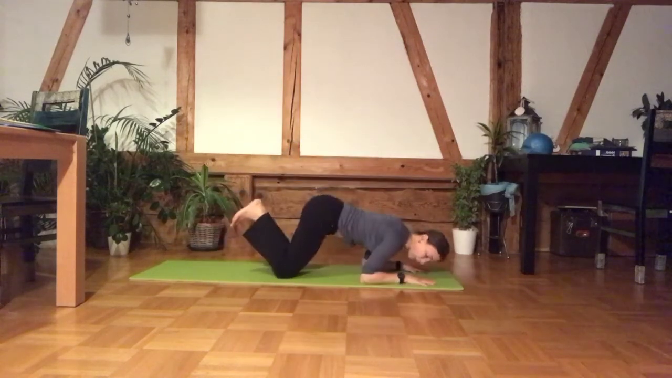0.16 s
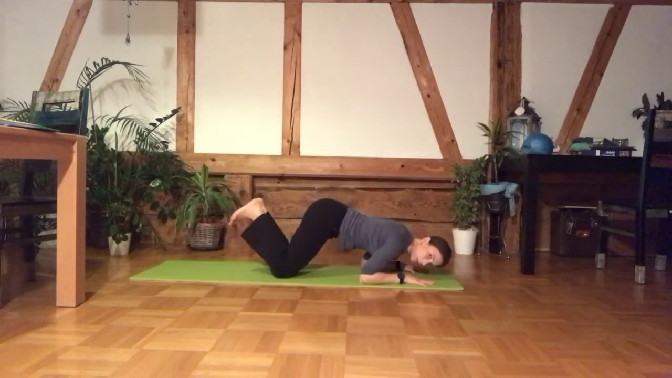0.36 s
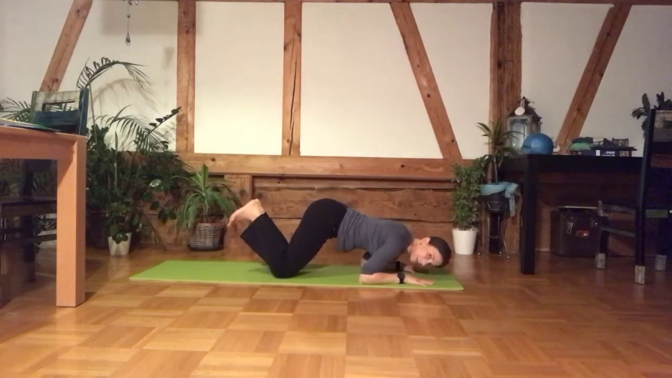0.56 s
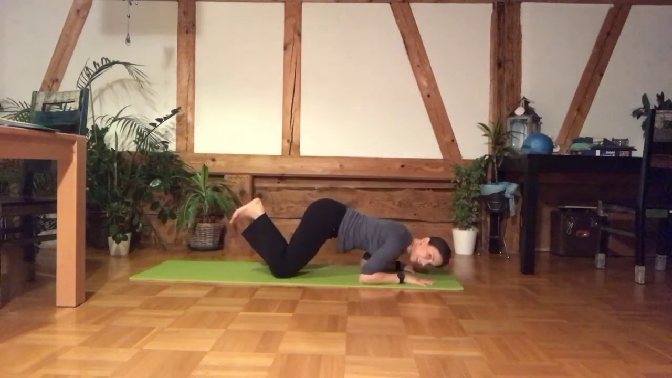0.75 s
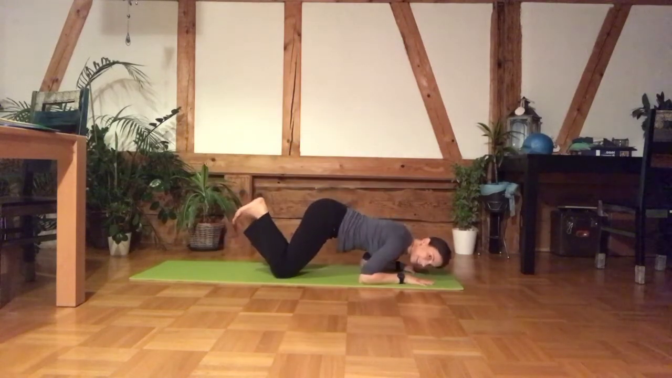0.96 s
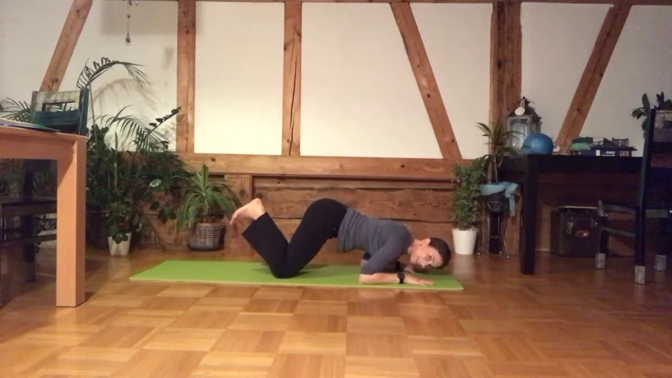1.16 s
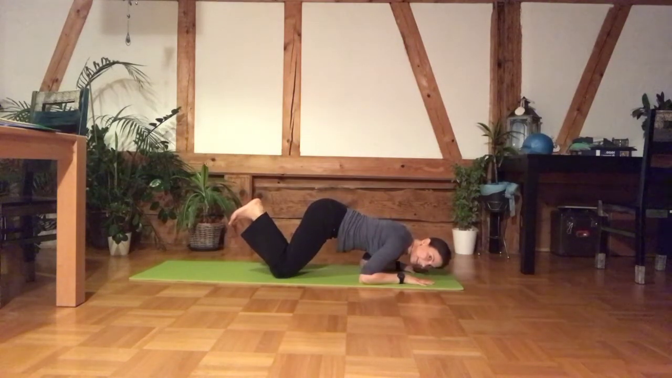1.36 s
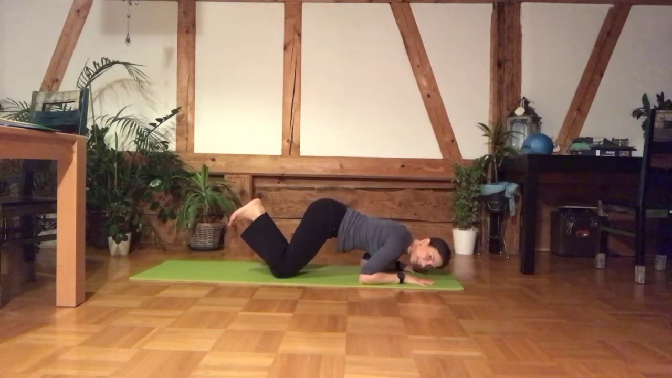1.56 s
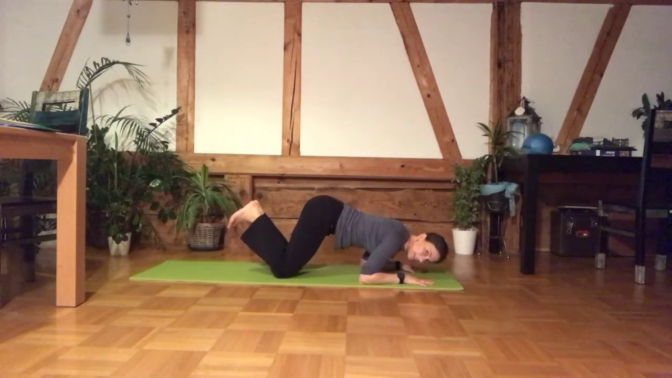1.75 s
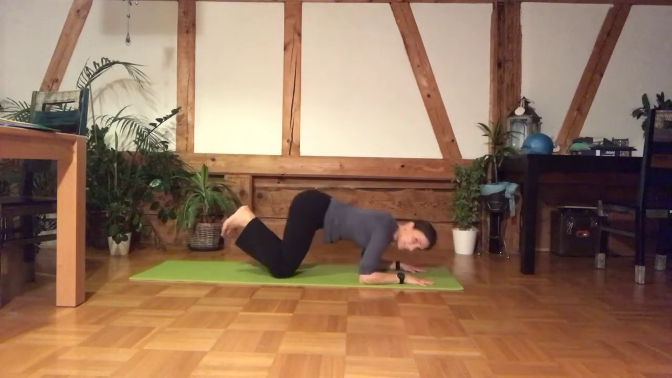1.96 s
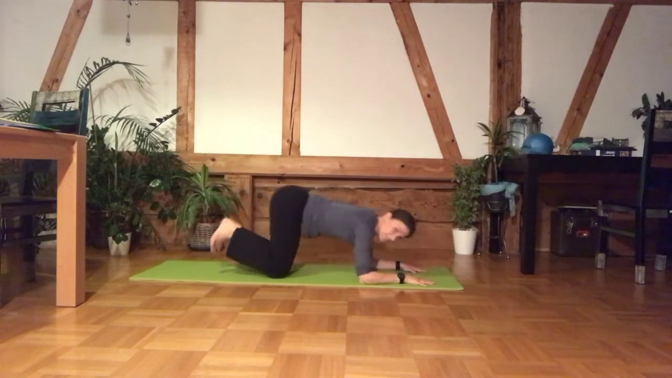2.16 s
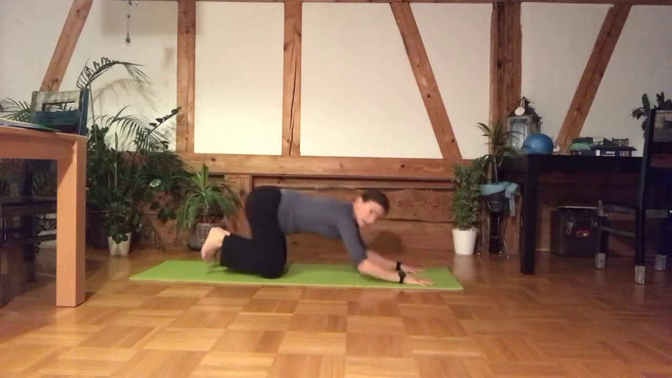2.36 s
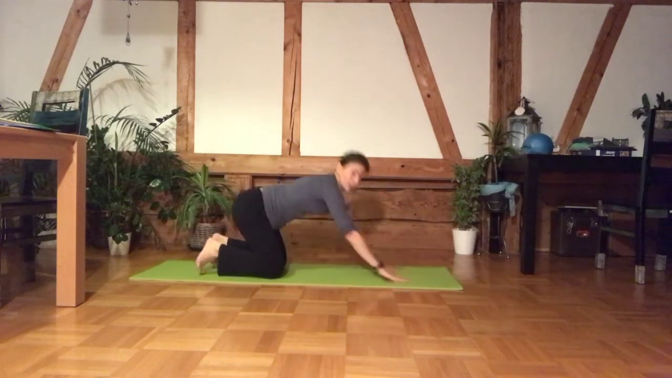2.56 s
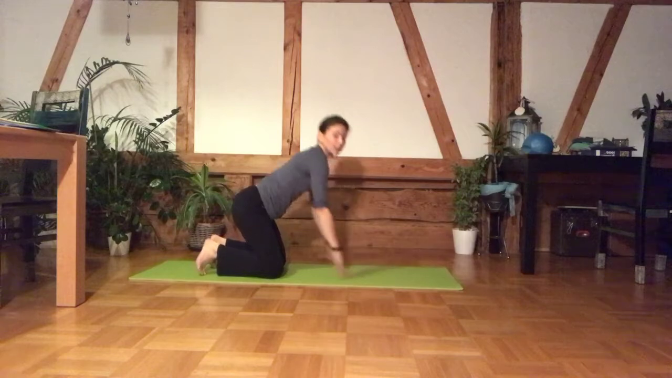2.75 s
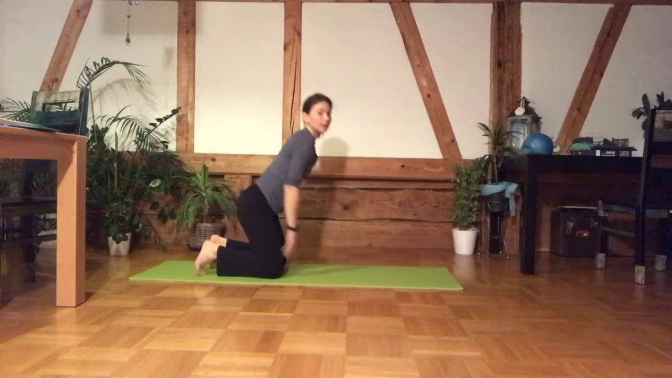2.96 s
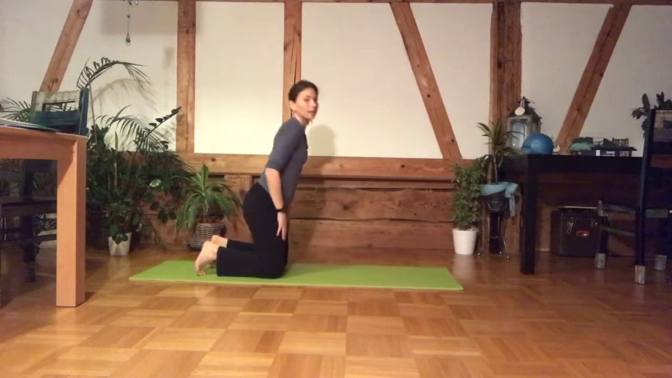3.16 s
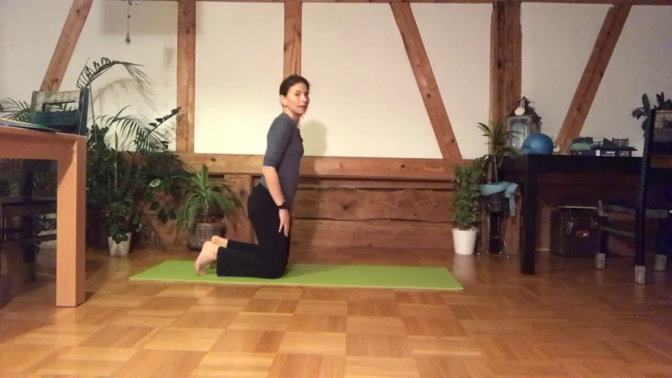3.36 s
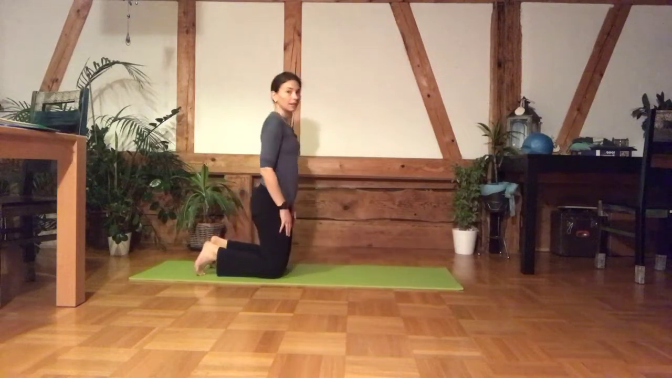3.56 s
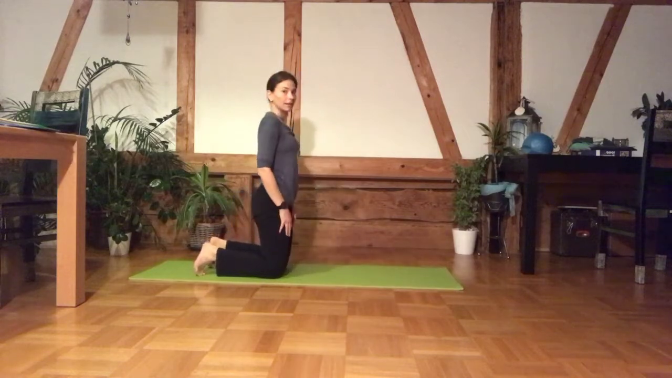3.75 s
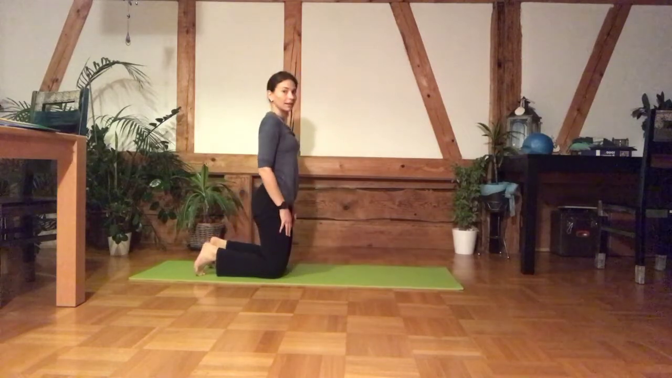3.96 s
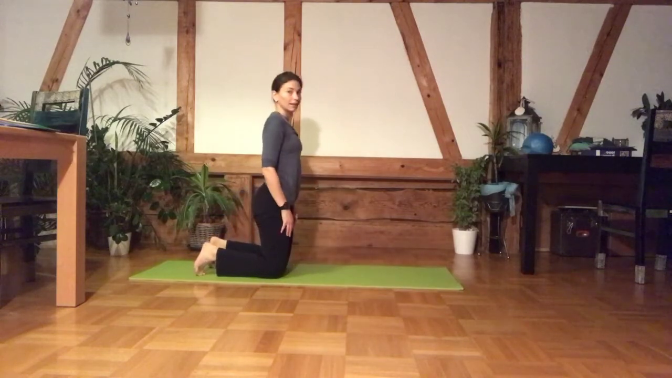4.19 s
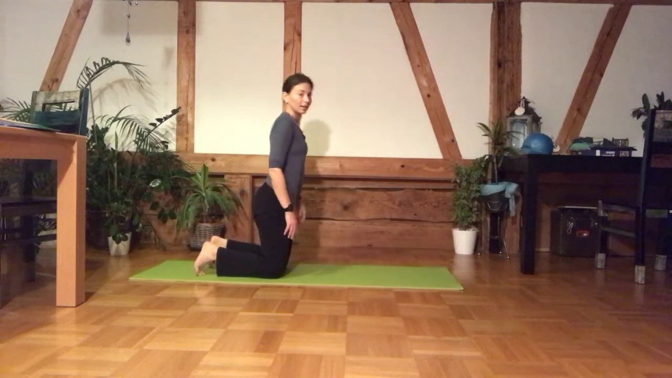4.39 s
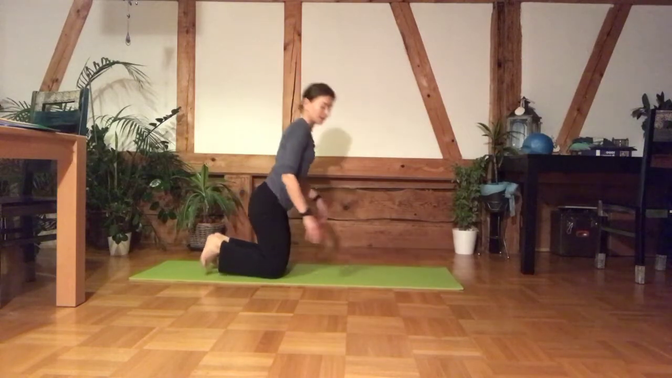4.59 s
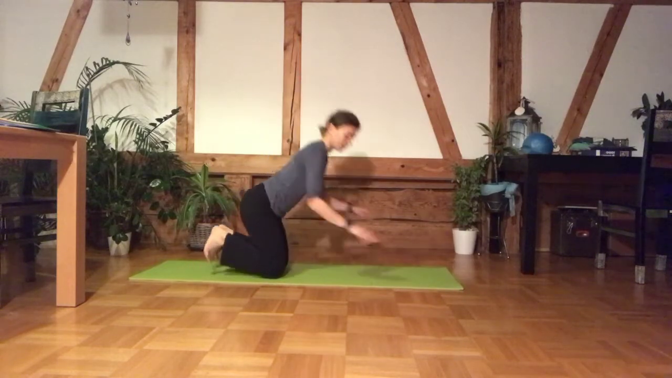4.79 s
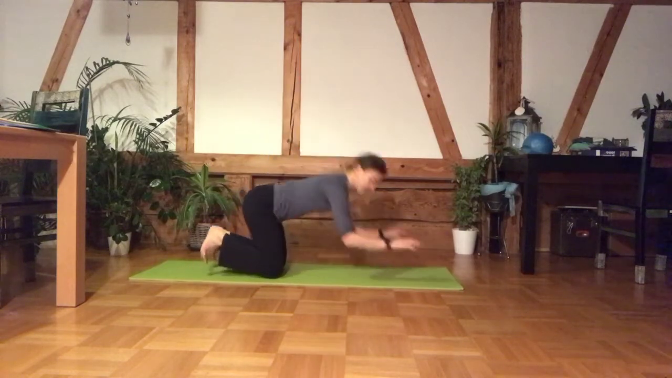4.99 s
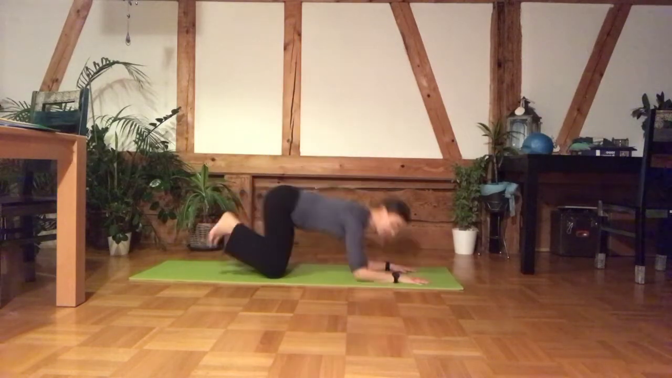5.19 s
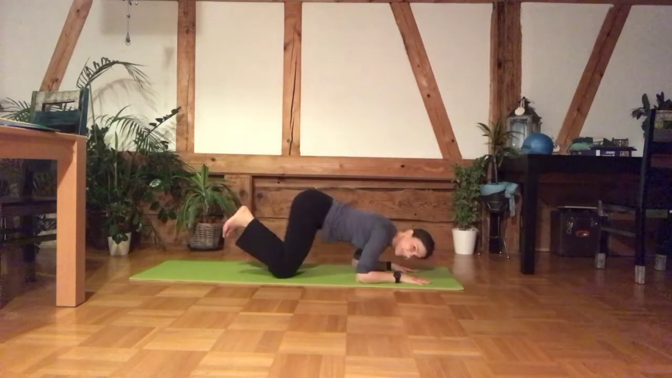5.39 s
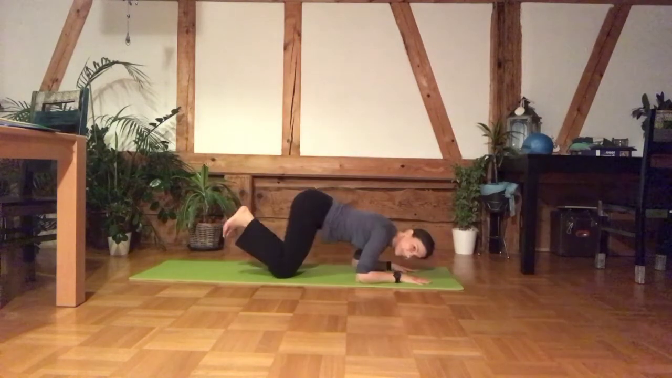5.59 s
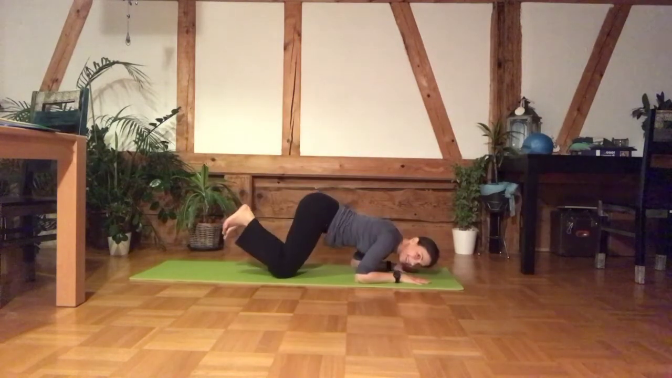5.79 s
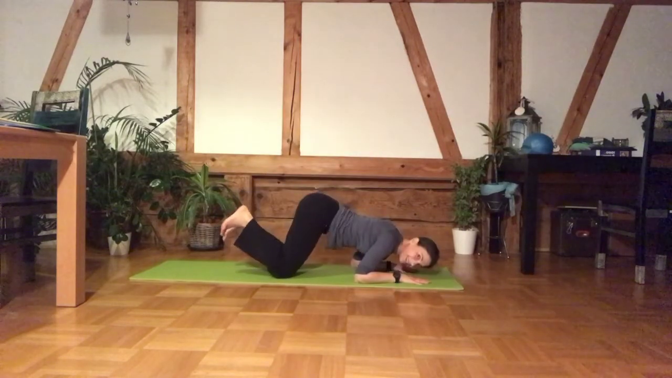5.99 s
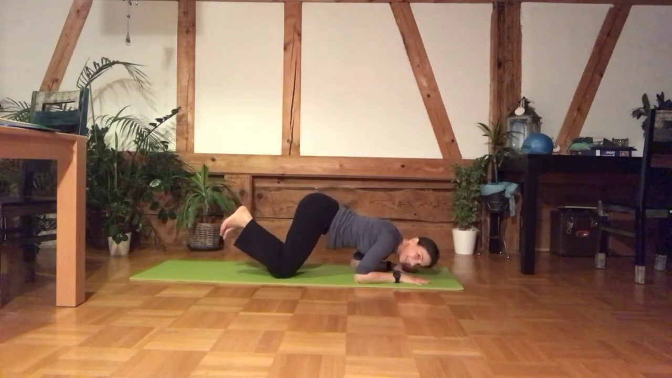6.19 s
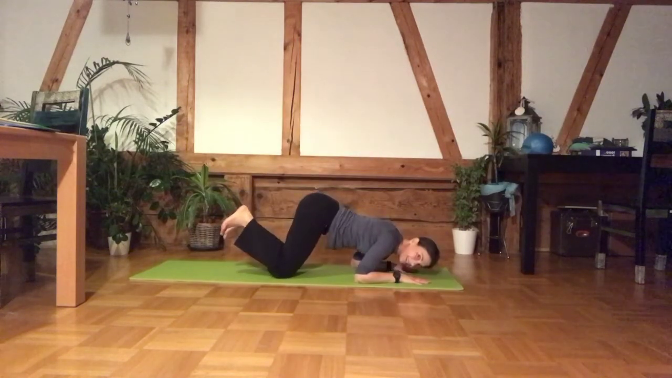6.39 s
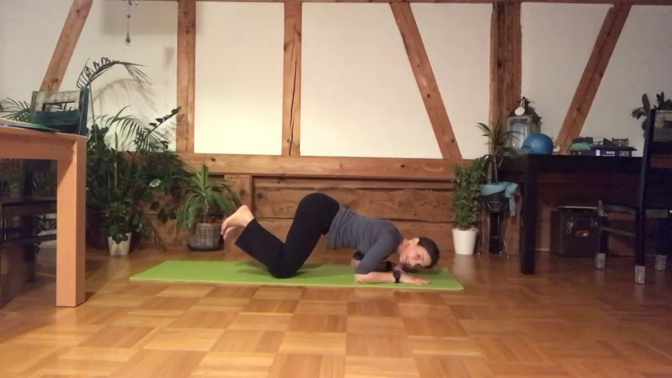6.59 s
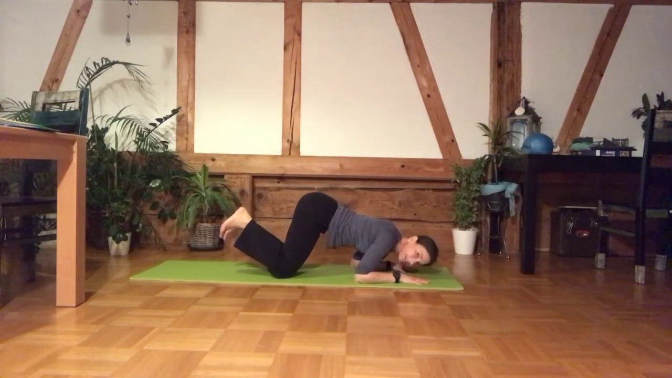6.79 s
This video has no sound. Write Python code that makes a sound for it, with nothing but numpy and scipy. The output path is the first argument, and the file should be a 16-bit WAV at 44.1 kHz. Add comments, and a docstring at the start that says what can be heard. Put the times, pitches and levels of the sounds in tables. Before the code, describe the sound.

Someone practises forward falls from the knees at home on a thin mat over parquet. The sound starts already in the crack and boom of a landing, followed by dull body rubbing. After a pause, skin brushes the foam in one airy half-second stroke. Faint clothing rustle, then another crisp, slightly softer slap with a lumpy low floor thump, dying away in a moderately live room, heard from a few metres.

```python
"""Forward breakfalls in a living room

From the knees onto a thin exercise mat on parquet, a few metres from the microphone; the first fall is just landing.
Forearms and palms slap the mat in noise cracks and room ring; the body's weight pulses the joist floor's modes.
Between the two falls a hand slides back over the mat, a hiss of filtered noise that follows its speed.
Clothes rustle faintly and the body rubs mat and boards, in noise swells over rumble, hiss and mains hum."""
import sys
import numpy as np
from scipy import signal
from scipy.fft import rfft, irfft
from scipy.io import wavfile

SR = 44100
rng = np.random.default_rng(int(sys.argv[2]) if len(sys.argv) > 2 else 0)


def unload_wav(signal):
    """Save mono or channel-first audio to the path in sys.argv[1] as 16-bit WAV at rate SR, clipped to [-1, 1]."""
    wavfile.write(
        sys.argv[1],
        SR,
        np.round(np.clip(np.atleast_2d(signal).T, -1, 1) * 32767).astype(np.int16),
    )


N = 301503
LEAD = SR // 4  # samples run before time 0, then dropped
TIME = np.arange(-LEAD, N) / SR  # seconds


def undb(db):
    """Decibels to gain."""
    return 10 ** (np.asarray(db) / 20)


def unit(x):
    """Scale to rms 1."""
    return x / np.sqrt(np.mean(x ** 2))


def noise():
    """White noise over the whole scene."""
    return rng.standard_normal(len(TIME))


def on_log_axis(hz, points):
    """Read (Hz, value) points on a log-frequency axis."""
    f, value = np.transpose(points)
    return np.interp(np.log(np.maximum(hz, 1)), np.log(f), value)


def colour(x, points, size=8192):
    """Causal minimum-phase filter with the given (Hz, dB) response, built by folding its cepstrum."""
    log_gain = np.log(undb(on_log_axis(np.fft.rfftfreq(size, 1 / SR), points)))
    cepstrum = irfft(log_gain)
    cepstrum[1:size // 2] *= 2
    cepstrum[size // 2 + 1:] = 0
    impulse = irfft(np.exp(rfft(cepstrum)))
    return signal.fftconvolve(x, impulse)[:len(x)]


def lowpass(x, hz, order=1):
    """Gentle low-pass."""
    sos = signal.butter(order, min(hz, SR / 2 - 1), fs=SR, output="sos")
    return signal.sosfilt(sos, x)


def friction(grain_db, grain_hz):
    """Dense tiny slips: noise whose strength wanders unevenly."""
    unevenness_db = grain_db * unit(lowpass(noise(), grain_hz))
    return unit(noise() * undb(unevenness_db))


def rubbing(rows, spectrum):
    """Brief bell-shaped swells of soft friction."""
    swell = sum(undb(db) * np.exp(-2 * ((TIME - s) / length) ** 2) for s, length, db in rows)
    return swell * unit(colour(friction(grain_db=1.5, grain_hz=150), spectrum))


# Reverberation of the living room: pitch_hz, t60_s (time to fall 60 dB)
ROOM_DECAY = [(100, 0.89), (180, 0.78), (310, 0.63), (600, 0.75), (1200, 0.56), (2200, 0.67), (4000, 0.57),
              (7000, 0.53), (15000, 0.27)]


def room_response(early_db, early_s):
    """Dense echoes, boosted at first by floor and near walls, decaying at each band's own rate; new for every spot."""
    t = np.arange(SR) / SR
    hz = np.fft.rfftfreq(SR, 1 / SR)
    spectrum = rfft(rng.standard_normal(SR))
    centres, t60s = np.transpose(ROOM_DECAY)
    response = np.zeros(SR)
    for share, t60 in zip(np.eye(len(centres)), t60s):
        band = irfft(spectrum * on_log_axis(hz, np.c_[centres, share]))
        response += band * np.exp(-np.log(1000) * t / t60)
    response *= 1 + undb(early_db) * np.exp(-t / early_s)
    return response / np.linalg.norm(response)


def room(x):
    """The room's answer to a sound made at one spot."""
    return signal.fftconvolve(x, room_response(early_db=4, early_s=0.0033))[:len(x)]


# Spectrum of the still room and microphone hiss: pitch_hz, level_db (relative)
STILL_COLOUR = [(12, -37), (20, -8), (42, 3), (70, -6.5), (106, -10.5), (126, -19.5), (175, -17),
                (259, -23), (306, -19), (465, -28.5), (505, -27.5), (1770, -30), (10500, -41.5),
                (12400, -40.5), (15500, -45)]
QUIET_DB = -61.5  # rms level of rumble and hiss


def still_room(hum_hz=100, hum_db=-75):
    """Low rumble of the house and microphone hiss as coloured noise, and a faint mains hum as one sine."""
    hum = undb(hum_db) * unit(np.sin(2 * np.pi * hum_hz * TIME))
    return undb(QUIET_DB) * unit(colour(noise(), STILL_COLOUR)) + hum


# The falls, all with the same slaps and pushes: first_touch_s, slap_level_db, weight_level_db (relative)
FALL_TIMES = [(-0.056, 2.5, 1.7), (5.2014, 0.5, 0)]
# Forearms and palms meeting the mat in each fall:
# delay_s (after first touch), level_db (relative), contact_s (decay constant), treble_corner_hz, bass_corner_hz
ARM_SLAPS = [(0, -21, 0.00087, 3030, 697), (.0033, -3.5, 0.0013, 4030, 296.5),
             (.009, -4, 0.00084, 7000, 398), (.0123, -2.5, 0.0023, 8000, 400),
             (.02, -1.5, 0.002, 4495, 70.9)]
# Spectrum of skin on foam: pitch_hz, level_db (relative)
SKIN_ON_FOAM = [(80, -2.5), (120, 2), (200, 0), (310, 5.5), (480, -4.5), (760, -8.5), (1000, 0), (1700, -2),
                (2200, -2.5), (3600, -8.5), (5000, -19), (7500, -20.5), (9200, -18), (15500, -17.5)]


def contacts(rows, crack_db):
    """Skin meets foam patch by patch: a short crack, while the room's ring builds up over the contact time."""
    out = np.zeros(len(TIME))
    t = np.arange(SR) / SR
    for s, db, contact_s, treble_hz, bass_hz in rows:
        closing = np.exp(-t / contact_s)
        crack = rng.standard_normal(SR) * closing
        crack = undb(crack_db) * crack / np.linalg.norm(crack)
        ring = (1 - closing) * room_response(early_db=2.5, early_s=0.037)
        hit = crack + ring
        without_bass = hit - lowpass(hit, bass_hz)
        start = LEAD + int(s * SR)
        out[start:start + SR] += undb(db) * lowpass(without_bass, treble_hz)
    return out


def slaps():
    """In every fall the arms smack the mat in the same quick roll and fill the room."""
    rows = []
    for s, slap_db, _ in FALL_TIMES:
        for delay, db, *touch in ARM_SLAPS:
            rows.append((s + delay, slap_db + db, *touch))
    return undb(16.5) * colour(contacts(rows, crack_db=-5.5), SKIN_ON_FOAM)


# Body weight loading the floor in each fall, from first touch to rebound:
# delay_s (after first touch), level_db (relative), push_s (force peaks at a quarter of it)
WEIGHT_PUSHES = [(.009, -13.5, 0.0099), (0.0409, -2.5, 0.011), (0.0681, -10, 0.0049), (.11, -21.5, 0.0026),
                 (.27, -20.5, .02)]
# Joist floor and low notes of the room; close pairs beat, so the boom is lumpy:
# pitch_hz, level_db (relative), t60_s (time to fall 60 dB)
JOIST_MODES = [(27.9, -12, 1.72), (31.56, 2.2, 0.7), (33.84, -7.5, 0.78), (38.38, -13.5, 1.4),
               (43.6, -12.5, 0.5), (54.65, -5, 1.1), (63.7, -16, 0.47), (63.6, 1.5, 0.53), (77, -1, 0.34),
               (108.5, -9.5, 0.281), (126.6, -1, 0.2), (159.1, -7.5, 0.72), (236.5, -15, 0.74),
               (315, -24.5, .8)]


def floor_boom(modes_db=-17):
    """Each push is a smooth pulse of force; the floor rings on after it in its modes."""
    force = np.zeros(len(TIME))
    for s, _, weight_db in FALL_TIMES:
        for delay, db, push_s in WEIGHT_PUSHES:
            age = np.maximum(TIME - s - delay, 0) / (push_s / 4)
            pulse = age * np.exp(-age)
            force += undb(weight_db + db) * pulse / pulse.sum()
    t = np.arange(2 * SR) / SR
    ring = np.zeros(len(t))
    for hz, db, t60 in JOIST_MODES:
        ring += undb(db) * np.sin(2 * np.pi * hz * t) * np.exp(-np.log(1000) * t / t60)
    return undb(modes_db) * signal.fftconvolve(force, ring)[:len(TIME)]


# The body shifting on the mat: middle_s, length_s (between points 4.3 dB below the peak),
# cloth_level_db, mat_level_db
BODY_SHIFTS = [(0.237, 0.18, -59.5, -49), (0.42, 0.18, -71.5, -58), (0.82, 0.3, -84, -71.5),
               (2.002, 0.33, -76.5, -73.5), (2.5, 0.21, -80, -65), (3.253, 0.44, -72, -70.5),
               (4.556, 0.06, -70.5, -80), (4.652, 0.06, -67.5, -82), (5.018, 0.14, -74.5, -78),
               (5.54, 0.13, -63.5, -59), (5.726, 0.095, -71, -81)]
# Spectrum of rustling clothes: pitch_hz, level_db (relative)
RUSTLE_COLOUR = [(300, -6.5), (1000, -2), (2500, 5.5), (4000, 1), (5000, -6), (9000, -7.5), (15500, -18)]
# Spectrum of the dull rub on mat and boards: pitch_hz, level_db (relative)
DULL_RUB_COLOUR = [(100, -20.5), (220, -10.5), (300, 0), (380, -6), (480, -12.5), (1000, -16),
                   (2000, -19.5), (5000, -59)]


def body_moves():
    """As the body shifts, clothes rustle and its weight rubs dully on mat and boards, both as friction swells."""
    clothes = rubbing([(s, length, db) for s, length, db, _ in BODY_SHIFTS], RUSTLE_COLOUR)
    weight = rubbing([(s, length, db) for s, length, _, db in BODY_SHIFTS], DULL_RUB_COLOUR)
    return clothes + weight


# Forearms peeling off the mat and the hand being set down:
# middle_s, length_s (between points 4.3 dB below the peak), level_db (before the room)
ARM_SCUFFS = [(2.2, 0.028, -61.5), (2.352, 0.04, -55)]
# Spectrum of the palm on foam: pitch_hz, level_db (relative)
PALM_ON_FOAM = [(150, -17), (330, -19), (750, -20), (950, -7.5), (1450, -2.5), (2300, 2), (3900, -3),
                (5000, -7), (7600, -10.5), (9400, -10.5), (15500, -16.5)]


def scuffs():
    """Short swells of skin friction, heard only through the room's echoes."""
    return room(rubbing(ARM_SCUFFS, PALM_ON_FOAM))


# The hand sliding back over the mat, a short creep and then the long pull: start_s, length_s, level_db (relative)
HAND_STROKES = [(2.317, 0.24, -58), (2.491, 0.46, -37.5)]
# Spectrum of the fingertips on foam: pitch_hz, level_db (relative)
FINGERS_ON_FOAM = [(150, -31.5), (750, -24.5), (1300, -32), (2200, -9), (3000, -2.5), (3900, -1),
                   (5000, -10.5), (7600, -13.5), (9400, -11), (10500, -16.5), (15500, -20.5)]
SPEED_POWER = 0.98  # loudness of the rub against the hand's speed
ROLL_AT_S, ROLL_S = 2.558, 0.043  # start and time constant of the roll from palm to fingertips
FINGER_SHARE = 0.8  # how far the roll goes, 1 being fingertips alone
PALM_DB, FINGER_DB = 2, -1  # relative loudness of palm and fingertips


def hand_slide():
    """Friction follows the hand's speed; the hiss rises as the contact rolls from the palm to the fingertips."""
    strength = 0
    for s, length, db in HAND_STROKES:
        speed = np.abs(np.sin(np.pi * np.clip((TIME - s) / length, 0, 1)))
        strength = strength + undb(db) * speed ** SPEED_POWER
    share = FINGER_SHARE * (1 - np.exp(-np.maximum(TIME - ROLL_AT_S, 0) / ROLL_S))
    roll = np.pi / 2 * np.clip(share, 0, 1)  # equal-power crossfade angle
    palm = undb(PALM_DB) * np.cos(roll)
    fingers = undb(FINGER_DB) * np.sin(roll)
    out = 0
    for weight, spectrum in (palm, PALM_ON_FOAM), (fingers, FINGERS_ON_FOAM):
        rub = strength * weight * unit(colour(friction(grain_db=1.0, grain_hz=400), spectrum))
        out = out + rub + undb(-7.5) * room(rub)
    return out


def scene():
    """All sources at the one microphone."""
    falls = slaps() + floor_boom()
    movement = body_moves() + scuffs() + hand_slide()
    return (still_room() + falls + movement)[None, LEAD:]


def record(dry, low_hz=8, top_hz=15750):
    """The microphone passes no steady pressure; the recorder cuts the top."""
    without_steady = dry - lowpass(dry, low_hz)
    top_cut = signal.ellip(10, .1, 80, top_hz, fs=SR, output="sos")
    return signal.sosfilt(top_cut, without_steady)


dry = scene()
out = record(dry)
unload_wav(out)
```